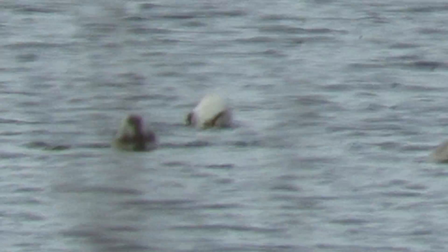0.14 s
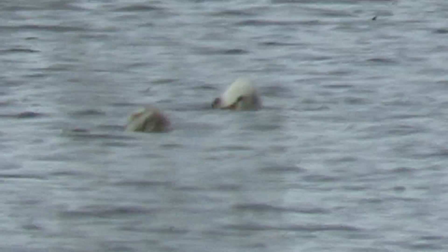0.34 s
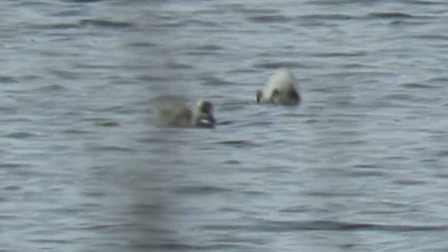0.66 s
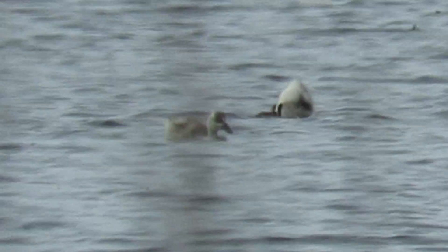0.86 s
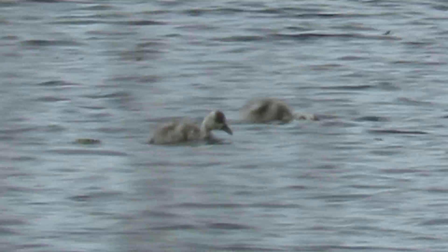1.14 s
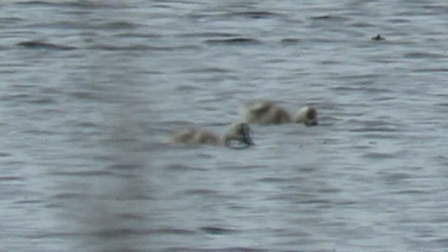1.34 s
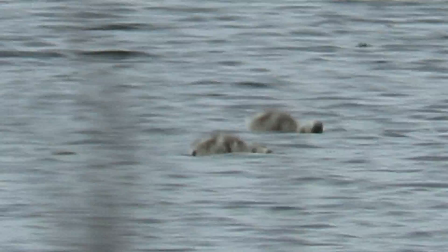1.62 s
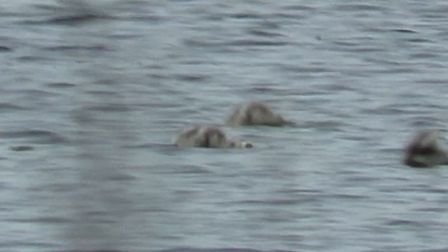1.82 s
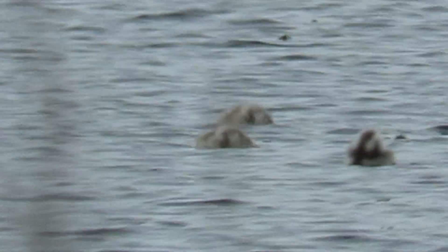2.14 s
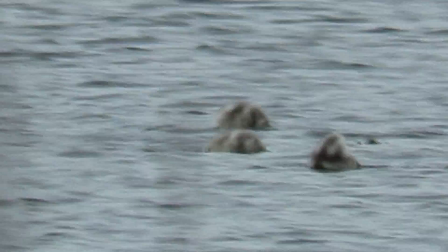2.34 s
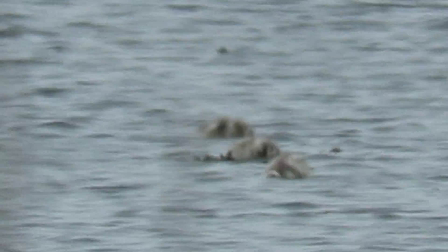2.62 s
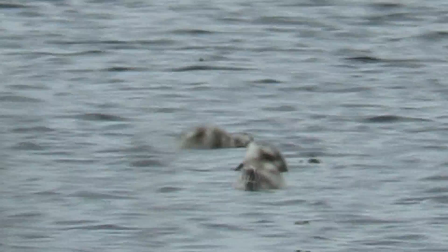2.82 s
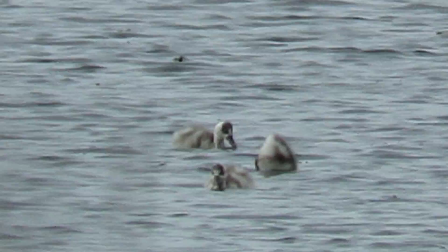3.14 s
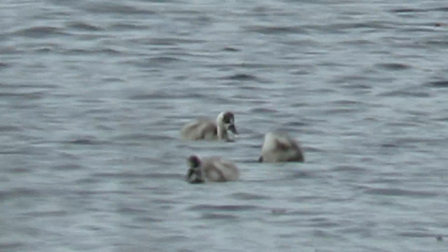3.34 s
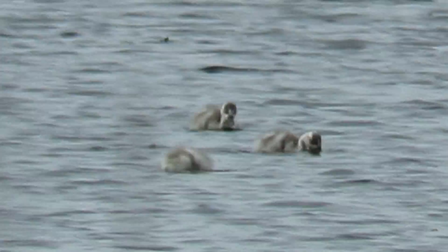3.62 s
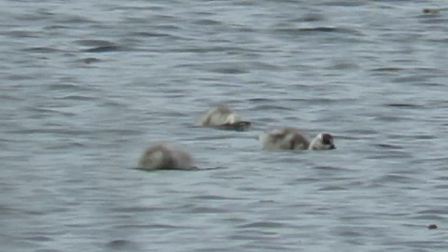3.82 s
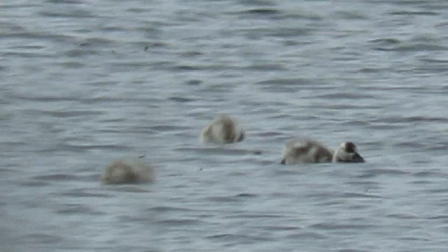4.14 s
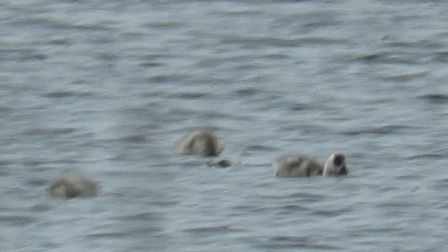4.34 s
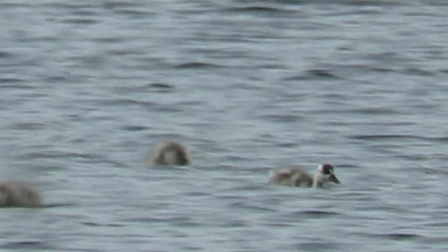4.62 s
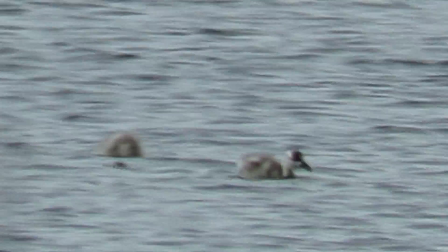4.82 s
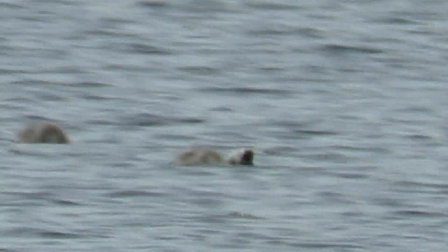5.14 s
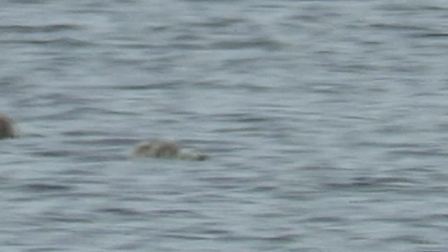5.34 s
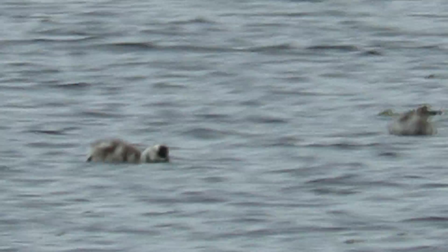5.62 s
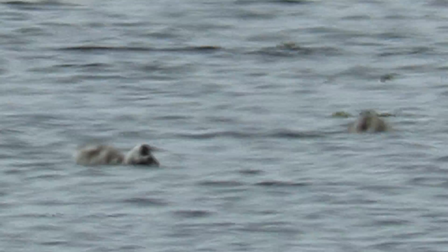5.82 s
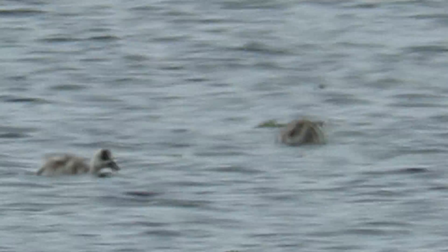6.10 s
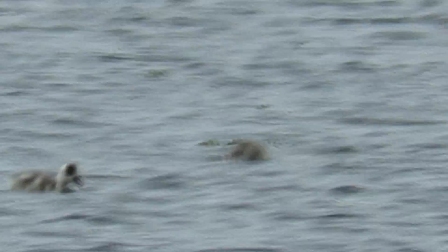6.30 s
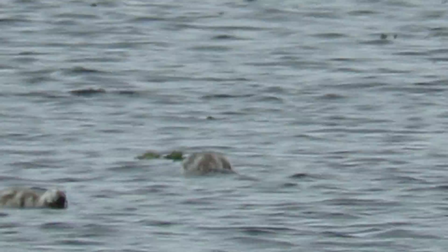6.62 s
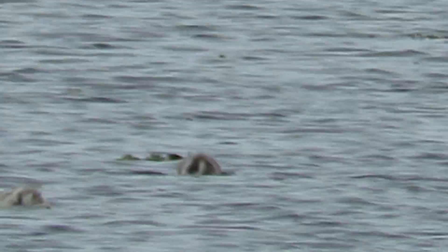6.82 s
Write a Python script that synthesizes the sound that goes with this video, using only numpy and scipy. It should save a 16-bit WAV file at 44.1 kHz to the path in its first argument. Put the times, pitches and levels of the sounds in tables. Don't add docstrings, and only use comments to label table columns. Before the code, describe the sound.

A soft, steady wash of lake water and low gusty wind open the scene, with a tiny peep at once and another near 0.7 s. From 0.8 s a water bird calls at a distance in short nasal, buzzy notes of about 0.05 s, light and quick until 1.5 s. From 1.7 s they grow louder and crack downward, about five a second, until 3.6 s, with a faint echo from reeds and banks. A sharp plastic knock lands at 2.5 s. From 4.0 s the notes gather in two- or three-note phrases, near 4.0, 4.4, 4.9 and 5.4 s, then clipped groups at 6.0 and 6.6 s. Wind buffets deeply around 4.2 s. A bright tick comes at 5.0 s, faint peeps around 4.8 to 5.3 s and a low one at 6.1 s. A blurred far hoot and motor whine stay barely audible. A heavy gust thumps at 6.85 s.

```python
import sys
import numpy as np
from scipy import signal
from scipy.fft import rfft, irfft, next_fast_len
from scipy.io import wavfile
from scipy.ndimage import uniform_filter1d

SR = 44100
rng = np.random.default_rng(int(sys.argv[2]) if len(sys.argv) > 2 else 0)


def wav_out(sig):
    wavfile.write(sys.argv[1], SR, np.round(np.clip(np.atleast_2d(sig).T, -1, 1) * 32767).astype(np.int16))


def elevation(decibels):
    levels = np.asarray(decibels, float)
    return 10 ** (levels / 20)


N = 307377


def evened(x):
    return x / np.sqrt(np.mean(x ** 2) + 1e-20)


def read(points, hz):
    point_hz, value = np.transpose(points)
    return np.interp(np.log(hz + 1), np.log(point_hz + 1), value)


def follow(s, level):
    return np.interp(np.arange(N) / SR, s, level)


def add(mix, start_s, sound):
    part = mix[..., round(start_s * SR):][..., :sound.shape[-1]]
    part += sound[..., :part.shape[-1]]


def resonate(x, hz, width_hz, times):
    turn = np.exp(2j * np.pi * hz * np.arange(len(x)) / SR)
    r = np.exp(-np.pi * width_hz / SR)
    for _ in range(times):
        x = 2 * (turn * signal.lfilter([1 - r], [1, -r], x / turn)).real
    return x


def noise(colour, same, lead, left_db, patchy_db, level_db):
    frames, hz = N // 256 + 5, np.fft.rfftfreq(1024, 1 / SR)
    a, b, c, d, patches = rng.standard_normal((frames, 513, 5)).T
    patches = uniform_filter1d(patches, size=10, axis=0)
    patches = evened(uniform_filter1d(patches, size=12, axis=1))
    likeness = np.clip(read(same, hz), -1, 1)[:, None]
    left = a + 1j * b
    right = likeness * left + np.sqrt(1 - likeness ** 2) * (c + 1j * d)
    half = (elevation(read(left_db, hz) / 2) * np.exp(.5j * read(lead, hz)))[:, None]
    colour_db = read(colour, hz)[:, None] + patchy_db * (1 + hz[:, None] / 7000) * patches
    spectra = np.array([left * half, right / half]) * elevation(colour_db)
    return elevation(level_db) * evened(signal.istft(spectra, nperseg=1024, noverlap=768)[1][:, :N])


# hz, left_lead_rad
PORT_LEAD = [(150, -.05), (430, -.3), (780, .4), (1550, .2), (2240, 1.6), (3200, 1.8), (3960, 2.6),
             (5250, 2.0), (7750, 2.2), (13900, 2.1)]
# hz, left_over_right_db
PORT_BALANCE = [(800, .5), (1600, .6), (2300, 3), (3200, 2.5), (4000, .3), (5200, 1.2), (9000, .2)]


def ports(x):
    size = next_fast_len(N)
    hz = np.fft.rfftfreq(size, 1 / SR)
    half = elevation(read(PORT_BALANCE, hz) / 2) * np.exp(.5j * read(PORT_LEAD, hz))
    return irfft(rfft(x, size) * np.array([half, 1 / half]), size)[:, :N]


# hz, level_db (per Hz)
WASH_COLOUR = [(59, -12), (100, -10.5), (175, -10), (361, -9.5), (514, -13.5), (794, -12.5), (862, -14.5),
               (1060, -15.5), (1450, -22), (1970, -26.5), (2380, -28.5), (4620, -37.5), (8420, -46),
               (12200, -56.5), (14100, -64)]
# hz, likeness (0-1)
WASH_LIKENESS = [(150, .99), (350, .9), (600, .7), (1300, .74), (2900, .4), (6000, .25), (13000, .35)]


def water():
    return noise(WASH_COLOUR, WASH_LIKENESS, PORT_LEAD, [(1000, 0.17)], patchy_db=1.16, level_db=-43)


# time_s, far_roar_db, buffeting_db
GUSTS = [(0, -52, -66), (.15, -42.5, -49), (.3, -52.5, -59), (.8, -41, -55), (1.45, -52.5, -73),
         (2.1, -44.5, -55), (2.6, -42.5, -48.5), (3.15, -47.5, -42.5), (3.75, -42, -42), (4.2, -44.5, -33),
         (4.65, -42.5, -48.5), (5.2, -45, -41.5), (5.65, -43, -50.5), (5.95, -45, -46), (6.3, -41, -49),
         (6.7, -41.5, -46.5), (6.85, -36, -28.5), (6.949, -63, -37.5)]
# hz, level_db (per Hz)
ROAR_COLOUR = [(14, -63), (22, -24), (40, -3.5), (70, 13), (110, -3.5), (170, -5.5), (260, -6.5),
               (400, -34), (800, -120)]
# hz, level_db (per Hz)
BUFFET_COLOUR = [(14, -59), (24, -32), (45, -1), (75, -7), (130, -3), (230, -15), (330, -16), (500, -20),
                 (700, -69), (1000, -120)]
# hz, likeness (0-1)
BUFFET_LIKENESS = [(30, 1), (130, 1), (300, 1)]
# hz, left_lead_rad
BUFFET_LEAD = [(30, 0), (80, -1.4), (140, -2), (300, -4)]
# hz, left_over_right_db
BUFFET_BALANCE = [(60, 5.5), (140, -1), (300, -2.5)]


def wind():
    s, roar_db, buffet_db = np.transpose(GUSTS)
    roar = noise(ROAR_COLOUR, [(60, .997), (250, .98)], [(60, 0)], [(60, .4)],
                 patchy_db=1.5, level_db=follow(s, roar_db))
    buffet = noise(BUFFET_COLOUR, BUFFET_LIKENESS, BUFFET_LEAD, BUFFET_BALANCE,
                   patchy_db=0.0, level_db=follow(s, buffet_db))
    return roar + buffet


# time_s, level_db
HOOT_SWELL = [(0, -59), (1.7, -61.5), (4.8, -56.5), (5.2, -62.5), (5.7, -56), (5.95, -55.5), (6.3, -53),
              (6.97, -56.5)]


def far_bird():
    a, b = [evened(resonate(v, 791, 53, times=2)) for v in rng.standard_normal((2, N))]
    level_db = follow(*np.transpose(HOOT_SWELL)) + 2.0
    return elevation(level_db) * np.array([a, 0.26 * a + 1.2 * b])


# start_s, length_s, top_hz, arch_depth (0-1), level_db
CHICK_PEEPS = [
    (0.042, 0.027, 3090, 0.08, -54.5),
    (0.69, 0.037, 3200, 0.08, -58),
    (4.839, 0.057, 3110, .04, -58),
    (5.245, .04, 3960, 0.3, -59),
    (6.089, 0.088, 1337, 0.05, -46.5),
    (5.17, 0.033, 793, 0.07, -46.5),
]


def chicks():
    out = np.zeros(N)
    for start_s, length_s, top_hz, arch, level_db in CHICK_PEEPS:
        u = np.linspace(-1, 1, round(length_s * SR))
        turns = np.cumsum(top_hz * (1 - arch * u ** 2)) / SR
        whistle = np.sin(2 * np.pi * turns) * np.sqrt(1 - u ** 2)
        add(out, start_s, elevation(level_db) * np.sqrt(2) * whistle)
    return out


# start_s, peak_db, low_hz, high_hz, t60_s, snap_db
BODY_TICKS = [
    (1.041, -44, 5200, 6300, .008, -12),
    (1.113, -45, 5200, 6300, .008, -12),
    (2.4804, -15, 780, 1500, .014, -7),
    (2.4806, -26, 430, 3300, .012, -4),
    (4.9935, -24, 4200, 7000, .006, -18),
    (4.9942, -31, 6300, 8800, .008, -17),
]


def camera_ticks():
    out, t = np.zeros(N), np.arange(2000) / SR
    for start_s, peak_db, low_hz, high_hz, t60_s, snap_db in BODY_TICKS:
        ring = np.sin(2 * np.pi * low_hz * t) + np.sin(2 * np.pi * high_hz * t)
        snap = evened(resonate(rng.standard_normal(2000), 1.2 * high_hz, 1.5 * high_hz, times=3))
        rise = np.minimum(t * low_hz / 2, 1) ** 2
        add(out, start_s, elevation(peak_db - 60 * t / t60_s) * rise * (ring + elevation(snap_db) * snap))
    return out


# hz, level_db
MOTOR_TONES = [(1029, -57.5), (2853, -73), (8152, -85), (8931, -90.5)]


def camera_motor():
    t = np.arange(N) / SR
    wobble = evened(uniform_filter1d(rng.standard_normal(N), size=6000))
    return sum(elevation(db) * np.sin(2 * np.pi * hz * t + 0.75 * wobble) for hz, db in MOTOR_TONES)


# hz, t60_s, level_db
BANK_TAIL = [(690, 0.57, 0.5), (1450, 0.58, -0.5), (2540, 0.36, -6), (3580, 0.81, 3.5), (4330, 0.22, 4.5)]
# delay_s, level_db (against the scattered tail)
REED_ECHOES = [(.027, -17), (.047, -10.5), (.083, -11.5), (.094, -16), (.104, -8.5)]


def banks(x):
    taps = np.zeros(SR)
    at = np.arange(300, SR - 20, 20)
    taps[at + rng.integers(0, 20, len(at))] = rng.choice([-1., 1.], len(at))
    hz, t, z = signal.stft(taps, SR, nperseg=256)
    bank_hz, t60_s, bank_db = np.transpose(BANK_TAIL)
    fall_db = -60 * t / np.maximum(np.interp(hz, bank_hz, t60_s), .05)[:, None]
    tail = signal.istft(z * elevation(fall_db), SR, nperseg=256)[1][:SR]
    tail = evened(tail) / np.sqrt(SR)
    for delay_s, echo_db in REED_ECHOES:
        tail[round(delay_s * SR)] += elevation(echo_db)
    colour_db = np.interp(np.arange(SR // 2 + 1), bank_hz, bank_db)
    tail = irfft(rfft(tail) * elevation(colour_db), SR)
    return signal.fftconvolve(x, tail)[:N]


def rounded(start_s, length_s, top_hz, place, level_db, climb, fall, bend):
    u = np.linspace(0, 1, round(length_s * SR))
    place = np.clip(place, .05, .95)
    up = np.clip(1 - u / place, 0, 1)
    down = np.clip((u - place) / (1 - place), 0, 1)
    hz = top_hz * (1 - climb * (place * up) ** 2 - fall * down ** bend)
    return start_s, hz, level_db, place, place + 0.22


def broken(start_s, length_s, top_hz, end_hz, level_db, head_s, climb, drop, break_s, slide_s, bend):
    t = np.arange(round(length_s * SR)) / SR
    up = np.clip(1.77 * np.clip(1 - t / head_s, 0, 1) - .8, 0, 1) ** 0.94
    crack = np.clip((t - head_s) / break_s, 0, 1)
    slide = np.clip((t - head_s) / min(length_s - head_s, slide_s), 0, 1) ** bend
    hz = top_hz * (1 - climb * up - drop * crack) - (top_hz * (1 - drop) - end_hz) * slide
    return start_s, hz, level_db, head_s / length_s, (head_s + 0.74 * break_s) / length_s


# hz, width_hz, level_db (against the third partial)
BILL_HISS = [(3460, 330, -15), (2700, 1500, -16)]


def hiss(count):
    air = rng.standard_normal(8192)[:count]
    rasp = sum(elevation(db) * evened(resonate(air, hz, width_hz, times=3)) for hz, width_hz, db in BILL_HISS)
    return rasp * np.linspace(.2, 1, count) * min(count / SR / 0.061, 1) ** 2


# hz, level_db
THROAT_COLOUR = [(690, -4), (810, -1), (1400, -3), (1700, 0.5), (1900, 4.5), (2450, 2.5), (2800, 0),
                 (3100, -4.5), (3420, -2), (3750, -5.5), (4100, -9.5), (4800, -19), (5600, -26.5),
                 (6200, -36.5)]
# time_s, muting_db, strain_db
BILL_MOVES = [(.82, 3.5, .6), (.92, -1, 6.5), (1.2, 0.8, -7), (1.55, -2.5, -3), (1.7, -2.5, .6),
              (1.85, 5, -5), (2.02, -1, 5), (2.19, -1, -11), (2.4, -1.3, -6), (2.75, 0.2, -2.5),
              (3.13, 0.5, -10), (3.5, 0, 1.5), (3.97, 0.5, -3), (4.42, -3, -2), (5.02, 0.2, 2),
              (5.4, 0.1, -4), (6.1, -1.5, -5), (6.65, 3, -10)]


def note(start_s, hz, level_db, top, peak, third_db, second_db, first_db, fourth_db, high_db):
    t = np.arange(len(hz)) / SR
    u, crest = t / t[-1], min(peak, .97)
    shape = np.interp(u, [0, top, crest, 1], [third_db[0], third_db[1], 0, third_db[2]])
    effort_db = level_db + uniform_filter1d(shape, size=90)
    hz = uniform_filter1d(hz, size=90)
    s, muting, strain = np.transpose(BILL_MOVES)
    muted_db, strain_db = np.interp(start_s, s, muting), np.interp(start_s, s, strain)
    flutter = evened(uniform_filter1d(rng.standard_normal(8192)[:len(t)], size=60))
    turns = np.cumsum(hz * (1 + .005 * flutter)) / SR
    k = np.arange(1, 9)[:, None]
    partial_db = read(THROAT_COLOUR, k * hz) - read(THROAT_COLOUR, 3 * hz)
    partial_db[0] = np.interp(u, [0, .6, 1], first_db) + read(THROAT_COLOUR, hz) - muted_db
    partial_db[1] = np.interp(u, [0, crest, 1], second_db) + read(THROAT_COLOUR, 2 * hz) - muted_db
    partial_db[:2] -= np.minimum(shape, 0) * (u < peak)
    partial_db[3] += fourth_db
    partial_db[4:] += high_db + strain_db
    partial_db[4] -= 9.0
    ripples = uniform_filter1d(rng.standard_normal((8, 8192)), size=220)[:, :len(t)]
    partial_db += 1.5 * evened(uniform_filter1d(ripples, size=220))
    waves = np.cos(2 * np.pi * (k * turns + rng.random((8, 1))))
    partials = np.sqrt(2) * (elevation(partial_db) * waves).sum(0)
    edge = np.clip(np.minimum(t / .004, (t[-1] - t) / .006), 0, 1)
    return start_s, (elevation(effort_db) * partials + elevation(level_db) * hiss(len(t))) * edge


# start_s, length_s, top_hz, top_place (0-1), level_db
ARCH_NOTES = [(.821, 0.036, 859, 0.02, -39), (.909, 0.03, 839, 0.38, -43), (.998, 0.032, 838, 0.25, -42.5),
              (1.094, .034, 804, 0.39, -43.5), (1.223, 0.045, 821, .5, -42.5),
              (1.381, .052, 813, 0.47, -44), (1.53, 0.054, 829, 0.38, -46.5)]
# start_s, length_s, top_hz, top_place (0-1), level_db
HOLD_NOTES = [(3.414, 0.056, 715, 0.77, -51), (3.684, .1, 716, 0.4, -47), (4.127, 0.062, 690, 0.4, -52.5),
              (4.594, .066, 725, 0.56, -52), (5.1, 0.04, 707, 0.5, -58.5), (5.6, 0.052, 713, 0.64, -61),
              (6.872, .055, 710, 0, -51.5)]
# start_s, length_s, top_hz, top_place (0-1), level_db
CLOSER_NOTES = [(5.39, 0.051, 835, 0.11, -41), (5.973, 0.046, 845, 0.11, -42.5),
                (6.088, 0.044, 791, 0.46, -45), (6.204, 0.034, 733, 0.17, -48),
                (6.634, 0.043, 797, 0.41, -41.5), (6.759, 0.041, 780, 0.45, -44.5)]
# start_s, length_s, top_hz, end_hz, level_db
CRACK_NOTES = [
    (1.683, .051, 857, 745, -40),
    (1.834, .055, 857, 716, -36),
    (2.009, .06, 850, 680, -41.5),
]
# start_s, length_s, top_hz, end_hz, level_db
STROKE_NOTES = [(2.184, 0.066, 852, 648, -40), (2.36, 0.068, 861, 676, -39.5),
                (2.544, 0.073, 866, 669, -39.5), (2.734, 0.067, 861, 665, -37.5),
                (2.923, 0.081, 852, 676, -37), (3.13, 0.085, 855, 673, -37),
                (3.359, 0.069, 858, 695, -38.5), (3.606, 0.078, 864, 668, -38)]
# start_s, length_s, top_hz, end_hz, level_db
LEAD_NOTES = [
    (3.969, 0.063, 836, 651, -35),
    (4.405, 0.062, 817, 640, -39),
    (4.894, .06, 822, 642, -37.5),
]
# start_s, length_s, top_hz, end_hz, level_db
SECOND_NOTES = [(4.068, 0.072, 755, 621, -45), (4.509, 0.063, 746, 632, -48), (5.005, 0.059, 735, 606, -47),
                (5.497, 0.056, 746, 640, -48)]
ARCH_SHAPE = dict(climb=0.447, fall=0.1, bend=2.1)
HOLD_SHAPE = dict(climb=0.114, fall=.11, bend=2.57)
CLOSER_SHAPE = dict(climb=0.25, fall=0.185, bend=2.01)
CRACK_SHAPE = dict(head_s=0.0181, climb=.05, drop=0.035, break_s=0.005, slide_s=.06, bend=1.18)
STROKE_SHAPE = dict(slide_s=.056, head_s=.012, climb=.065, drop=.07, break_s=.004, bend=.96)
LEAD_SHAPE = dict(head_s=0.0072, climb=0.017, drop=0.0358, break_s=.006, slide_s=.06, bend=1.25)
SECOND_SHAPE = dict(head_s=0.0191, climb=0.121, drop=0.045, break_s=0.0026, slide_s=.06, bend=1.19)
# third_db (start, top, end),
# second_db (start, peak, end), first_db (start, middle, end), fourth_db, high_db (fifth and up)
ARCH_TONE = dict(third_db=(-0.5, 1, 4), second_db=(7.5, 6, 4), first_db=(0, 5, 0), fourth_db=-6, high_db=-2)
HOLD_TONE = dict(third_db=(-1.2, 1, -10), second_db=(1.5, 0, .6), first_db=(6, -7, -4),
             fourth_db=4, high_db=7)
CLOSER_TONE = dict(third_db=(1.5, 1.9, -0.5), second_db=(-3, -4, -7), first_db=(-1.5, 1.5, -10),
               fourth_db=-2.5, high_db=7)
CRACK_TONE = dict(third_db=(-2, -11, -6), second_db=(1.5, -2.5, -3), first_db=(.6, 2.5, -1.5),
              fourth_db=-6, high_db=-6)
STROKE_TONE = dict(third_db=(1.5, -2, -9), high_db=5, second_db=(.7, -5, -3.5), first_db=(-3.5, 4.5, -1.5),
               fourth_db=-4.5)
LEAD_TONE = dict(third_db=(1.5, -4, -13), second_db=(-3, -9, -4), first_db=(-8, 4.5, -11),
             fourth_db=-3.5, high_db=6)
SECOND_TONE = dict(third_db=(-3.5, 3.2, -8), second_db=(0, -4, -5.5), first_db=(1.5, 3, -1.5),
               fourth_db=.6, high_db=4.5)


def water_bird():
    out = np.zeros(N)
    kinds = [(ARCH_NOTES, rounded, ARCH_SHAPE, ARCH_TONE),
             (HOLD_NOTES, rounded, HOLD_SHAPE, HOLD_TONE),
             (CLOSER_NOTES, rounded, CLOSER_SHAPE, CLOSER_TONE),
             (CRACK_NOTES, broken, CRACK_SHAPE, CRACK_TONE),
             (STROKE_NOTES, broken, STROKE_SHAPE, STROKE_TONE),
             (LEAD_NOTES, broken, LEAD_SHAPE, LEAD_TONE),
             (SECOND_NOTES, broken, SECOND_SHAPE, SECOND_TONE)]
    for rows, pitch, shape, tone in kinds:
        for row in rows:
            add(out, *note(*pitch(*row, **shape), **tone))
    return out


def scene():
    bird = water_bird()
    echo = elevation(-11.0) * banks(bird)
    camera = camera_ticks() + camera_motor()
    return ports(bird + echo + camera + chicks()) + far_bird() + wind() + water()


def low_pass(x):
    return signal.sosfilt(signal.butter(12, 14280, fs=SR, output="sos"), x)


def record(dry):
    bass_cut = signal.butter(4, 33, "high", fs=SR, output="sos")
    mix = signal.sosfilt(bass_cut, dry)
    return low_pass(mix)


dry = scene()
out = record(dry)
wav_out(out)
```